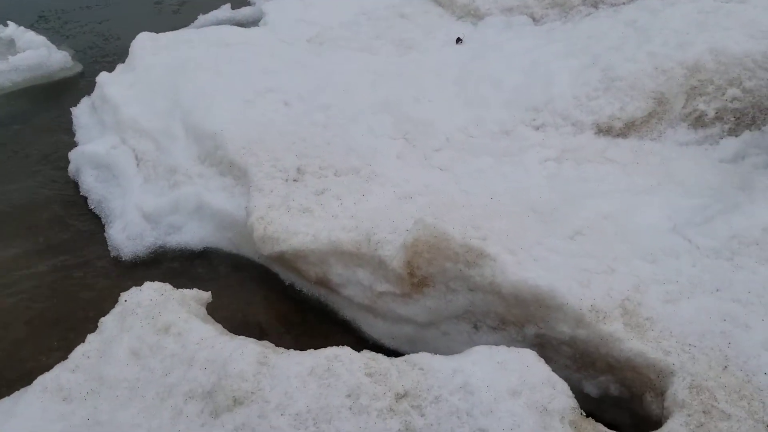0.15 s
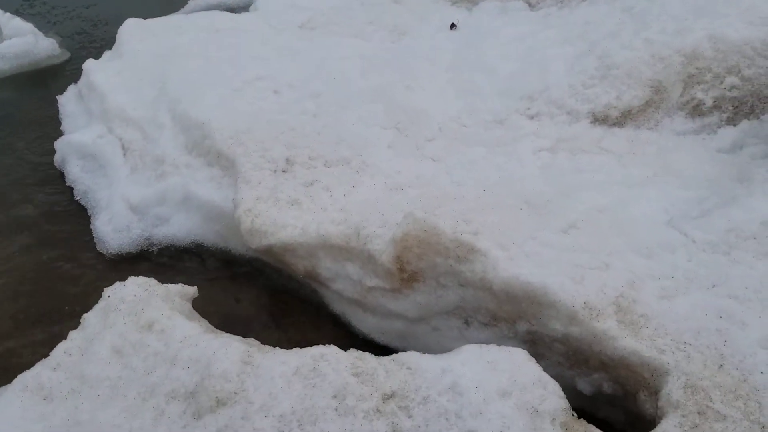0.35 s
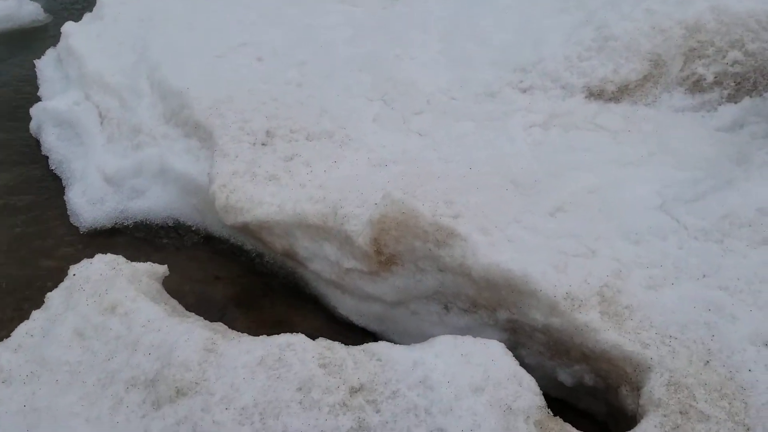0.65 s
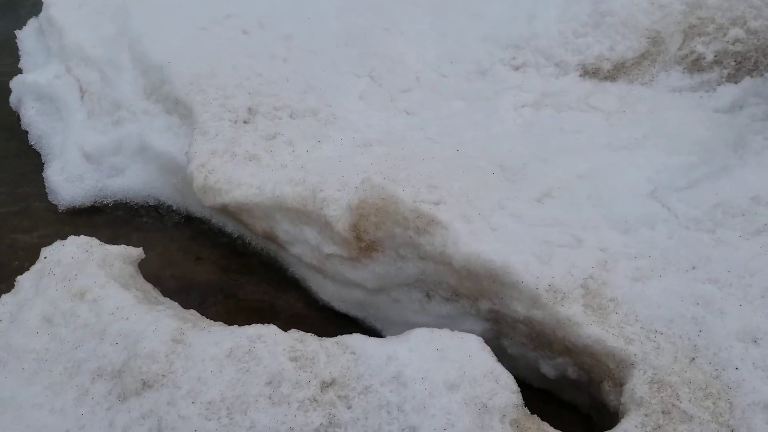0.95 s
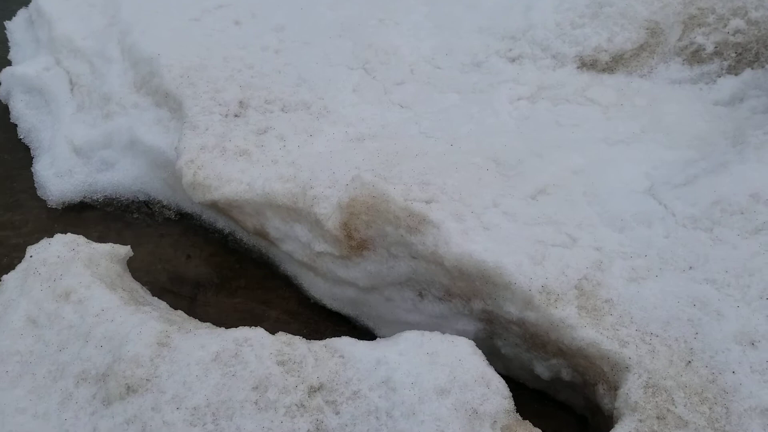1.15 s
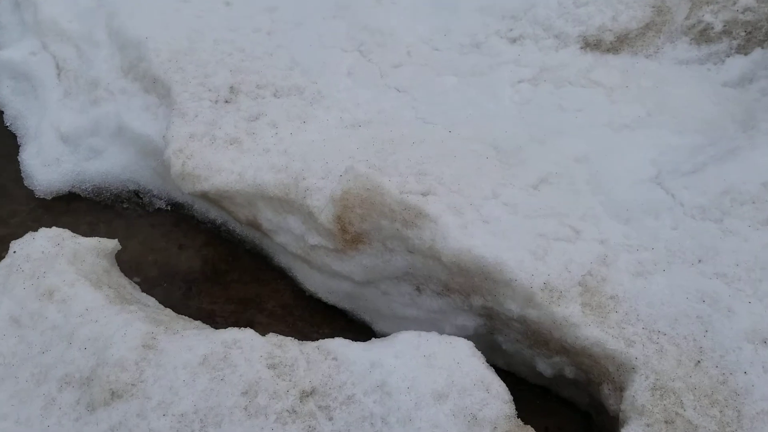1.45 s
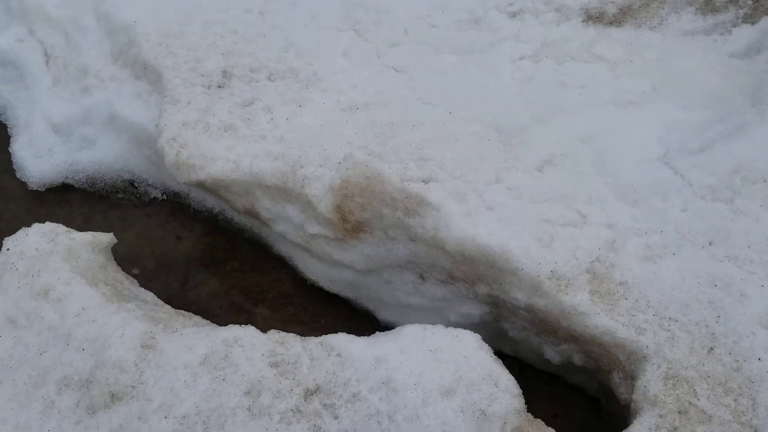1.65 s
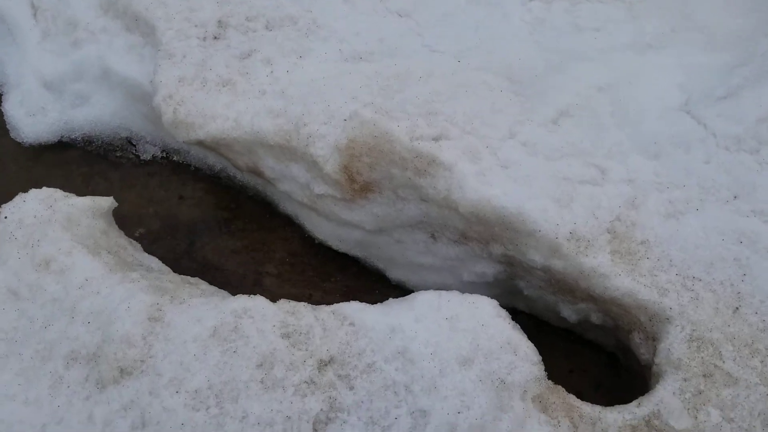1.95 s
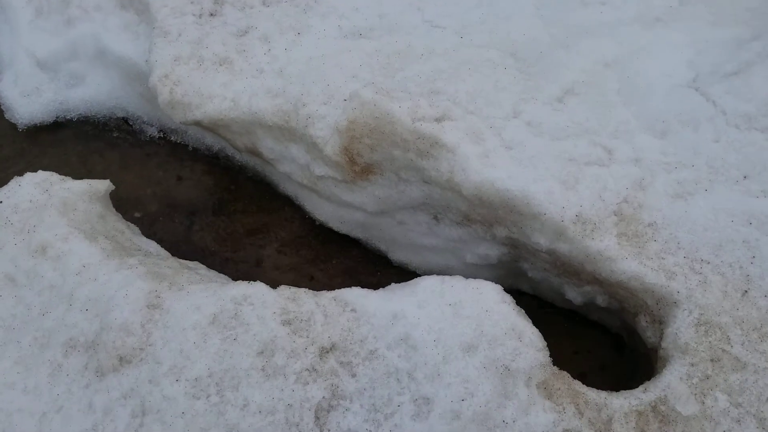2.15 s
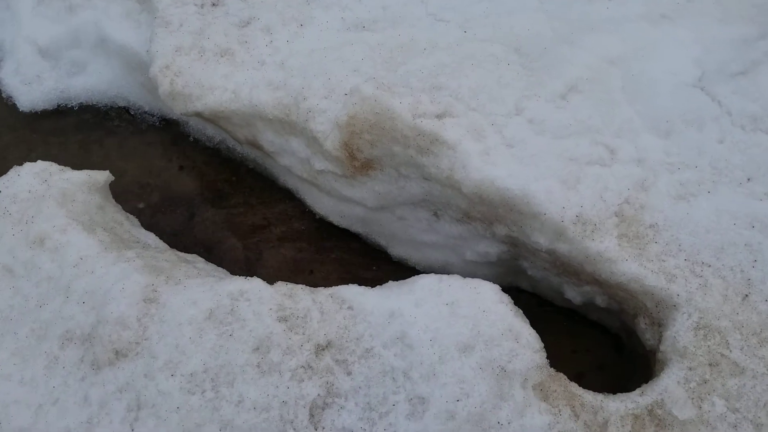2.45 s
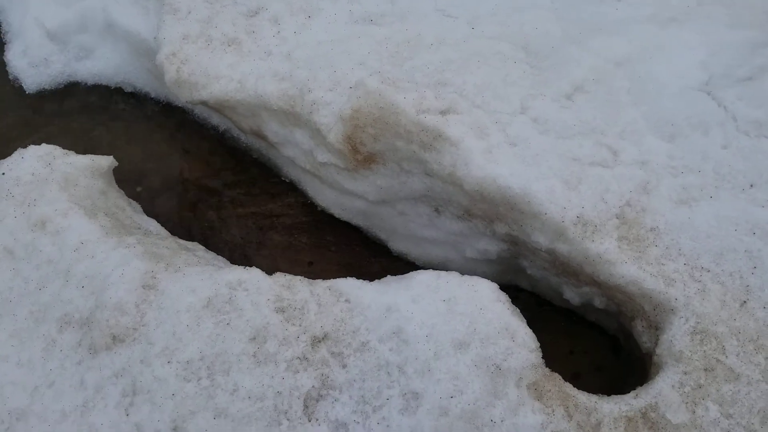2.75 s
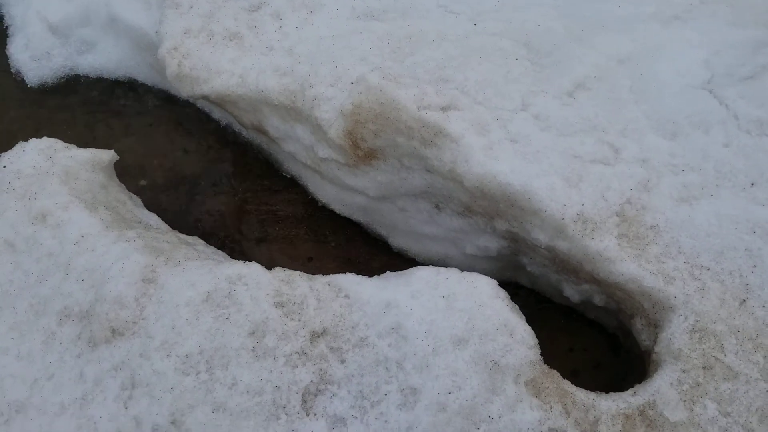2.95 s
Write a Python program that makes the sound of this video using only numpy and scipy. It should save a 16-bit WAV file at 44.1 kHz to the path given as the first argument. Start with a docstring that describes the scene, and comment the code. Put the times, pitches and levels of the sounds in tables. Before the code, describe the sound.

Icy crust cracks and crunches in dense short bursts over soft low wind.

```python
"""Cracking shore ice

Icy crust cracks and crunches in bursts on a frozen lake shore, close to a two-port microphone.
Each crack is a decaying hollow knock with a gated-noise snap; crushed grains are random clicks ringing
small pieces. Under them: gusty wind as shaped low noise, slab thuds as short sine bursts, and a faint
hiss of water and air as coloured noise."""
import sys
import numpy as np
from scipy import signal
from scipy.fft import rfft, irfft, next_fast_len
from scipy.io import wavfile
from scipy.ndimage import uniform_filter1d

SR = 44100
rng = np.random.default_rng(int(sys.argv[2]) if len(sys.argv) > 2 else 0)


def pcm_store(signal):
    """Save signal as 16-bit PCM."""
    levels = np.round(np.clip(np.atleast_2d(signal), -1, 1) * 32767)
    wavfile.write(sys.argv[1], SR, levels.astype(np.int16).T)


def volts_from_db(level):
    """Convert decibel levels to linear amplitude ratios."""
    exponent = np.asarray(level, float) / 20
    return 10 ** exponent


N = 136710  # samples

# Spectrum of the hiss. Each row: frequency in Hz, relative density in dB per Hz.
HISS_SPECTRUM = [(290, 12.5), (500, 10), (1160, -3.5), (1700, 4), (2590, -3.5), (5360, -12.5),
                 (12500, -16.5), (16200, -15)]
# Hiss level over time. Each row: time in seconds, level in dB.
HISS_LEVEL = [(0, -45), (1.3, -44), (3.1, -48.5)]
# Gusts on the microphone. Each row: time in seconds, buffeting level in dB before the port imbalance.
WIND_LEVEL = [(0, -52.5), (.3, -42), (.59, -37), (.64, -26), (.69, -48), (.87, -50), (.92, -37.5),
              (1.08, -44.5), (1.16, -36.5), (1.27, -40.5), (1.37, -34), (1.49, -36), (1.8, -37.5),
              (2.05, -47), (2.41, -37), (2.76, -43), (3.1, -45.5)]
# Spectrum of the wind noise. Each row: frequency in Hz, relative density in dB per Hz.
WIND_SPECTRUM = [(15, -45), (25, -9), (81, 1.5), (170, -9.5), (284, -16), (900, -37), (1170, -40)]
# Slabs settling into the water. Each row: centre in seconds, envelope peak in dB, frequency in Hz.
THUDS = [(.606, -25, 150), (1.342, -27, 273), (1.533, -21.5, 433), (1.886, -26.5, 237), (2.301, -21.5, 326),
         (2.404, -29, 83.4), (2.838, -28.5, 124)]
# Cracks. Each row: time in seconds, knock peak in dB before the body low-pass, knock frequency in Hz,
# snap level in dB before SNAP_GAIN_DB.
CRACKS = [(0.3314, -19.5, 1300, -26.5), (0.394, -18.5, 1290, -19.5), (0.4, -19.5, 740, -20.5),
          (0.4017, -20.5, 860, -49), (0.4062, -22, 1500, -40), (0.4118, -28, 1760, -43),
          (0.4182, -23, 1420, -42), (0.4228, -22, 1420, -48), (0.4284, -17, 1500, -41),
          (0.4374, -24, 1300, -34), (0.4454, -9.5, 1210, -21), (0.4921, -19.5, 1440, -34.5),
          (0.5476, -24, 1370, -30), (0.5627, -16.5, 1530, -23), (0.5654, -14, 900, -30),
          (0.5877, -14.5, 1330, -27), (0.607, -16.5, 760, -32), (0.6297, -16, 1450, -31.5),
          (0.7197, -18.5, 980, -33), (0.722, -29, 1500, -35), (0.8003, -14, 1270, -28),
          (0.8033, -15, 1500.0, -28), (0.8292, -12.5, 910, -26), (0.8762, -24.0, 1480, -56),
          (0.9571, -12, 890, -36), (1.01, -16.5, 1200, -33), (1.0134, -18, 1250, -29),
          (1.0448, -22.5, 1030, -56), (1.1042, -14, 1640, -27.5), (1.183, -25.5, 1650, -48),
          (1.4709, -13.5, 1290, -28), (1.4754, -21, 1370, -38), (1.4794, -19.5, 1870, -34),
          (1.5268, -21.5, 1800, -21.5), (1.5338, -13, 1710, -20), (1.5498, -28, 1900, -51),
          (1.559, -19, 780, -34), (1.5738, -11, 930, -24), (1.6101, -22.5, 1750, -27),
          (1.6452, -13, 1490, -22), (1.65, -20.5, 1320, -37), (1.6833, -10.5, 1500, -21),
          (1.6885, -21, 1830, -18), (1.7536, -14, 695, -20), (1.7797, -14.5, 950, -26.5),
          (1.8118, -11, 664, -22), (1.8215, -17, 1970, -37), (1.8275, -18, 1700, -30),
          (1.8387, -14.5, 1500.0, -28), (1.8441, -22, 1500, -36), (1.9065, -17, 2260, -19.5),
          (1.9422, -18.5, 1080, -29), (1.9552, -19, 1260, -33), (1.9814, -22.5, 633, -39),
          (1.991, -20, 1000, -29), (2.0432, -18, 1270, -28), (2.3036, -22, 1190, -24),
          (2.3075, -17, 694, -43), (2.3543, -21, 1080, -38), (2.4156, -16.5, 1030, -20.5),
          (2.4441, -23.5, 1030, -18.5), (2.469, -25.5, 1510, -31), (2.6078, -25, 1860, -39)]
# Splinters, bright ticks with little body. Each row: time in seconds, snap level in dB before SNAP_GAIN_DB.
SPLINTERS = [(0.228, -30), (0.7893, -33.5), (1.691, -25), (1.8997, -27), (2.0054, -27.5), (2.083, -34),
             (2.408, -25), (2.5355, -32.5), (2.605, -39), (2.6202, -27), (2.647, -36.5), (2.681, -36),
             (2.779, -25)]
# Crust being crushed. Each row: start in seconds, length in seconds, body level in dB before the body
# low-pass, treble level in dB.
CRUNCHES = [(0.23, 0.024, -41, -60), (0.399, 0.076, -37.5, -52.5), (0.558, 0.012, -31, -53),
            (0.714, 0.0091, -35.5, -43), (0.765, 0.032, -40, -50.5), (0.811, 0.033, -30.5, -45),
            (0.846, 0.028, -47.5, -57), (1.038, 0.079, -42, -63), (1.465, 0.012, -23.5, -35),
            (1.524, 0.049, -38, -46.5), (1.812, 0.051, -40.5, -53), (1.894, 0.018, -35, -49),
            (1.972, 0.041, -38, -55.5), (2.057, 0.023, -38.5, -57), (2.28, 0.051, -39.5, -43),
            (2.342, 0.028, -38.5, -47), (2.406, 0.012, -31, -49.5), (2.435, 0.023, -34, -47),
            (2.6, 0.031, -40.5, -53)]
# Spectrum of snaps and dust. Each row: frequency in Hz, relative density in dB per Hz.
SNAP_SPECTRUM = [(1760, -36), (3000, -7), (3840, -10), (6470, 1), (7780, -12), (12600, -2), (15500, -14),
                 (16200, -24)]

LUMP_DB, OWN_LUMP_DB = 4, 4  # rms level swing: shared, per port
WIND_SAME, WIND_IMBALANCE_DB = 0.035, 0.8  # imbalance: left up, right down
BUFFET_HZ, ROAR_DB = 158, -22.5
ROAR_FOLLOWS = 0.59  # exponent: above the buffeting the roar follows gusts only in part
THUD_CYCLES = 2.95

RISE_S, KNOCK_T60_S, BODY_TOP_HZ = 0.00025, 0.0068, 3000
RING_HZ, RING_DB = 1950, -4  # microphone port resonance: nominal frequency, level re the knock sine
SNAP_T60_S, SNAP_GAIN_DB, SNAP_SAME = 0.0072, 1.5, 0.054
SPLINTER_BODY_DB, SPLINTER_HZ = -19.5, 1500  # body peak re the snap
RATTLE_DB, RATTLE_T60_S = -19, 0.027  # chips rattle on after each crack, re the knock
GRAINS_PER_S, GRAIN_SPREAD_DB = 700, 4
DUST_PER_S, DUST_SPREAD_DB = 1500, 0.5
CRUNCH_EDGE_S, SETTLE_S, SETTLE_DB = 0.0017, 0.085, -9
STRAY_PER_S, STRAY_BODY_DB, STRAY_TREBLE_DB = 60, -58, -61  # lone crumbs ticking at any time
ECHO_S, ECHO_DB = (0.001, 0.0016), -23  # a near reflection reaches each port at its own time
LEFT_LAG_S = 0.00008


def evened(x):
    """Scales to rms 1."""
    return x / np.sqrt(np.mean(x ** 2) + 1e-20)


def add(mix, start_s, sound):
    """Adds a sound into the mix in place, cut at the end."""
    part = mix[..., round(start_s * SR):][..., :sound.shape[-1]]
    part += sound[..., :part.shape[-1]]


def colour(x, spectrum):
    """Filters by a (Hz, dB) table, keeping the power of white noise."""
    hz, db = np.transpose(spectrum)
    size = next_fast_len(N)
    bin_hz = np.fft.rfftfreq(size, 1 / SR) + 1  # +1 avoids log(0)
    gain = volts_from_db(np.interp(np.log(bin_hz), np.log(hz), db, left=-90, right=-90))
    return irfft(rfft(x, size) * evened(gain), size)[..., :N]


def curve(points):
    """Gain over time, linear in dB between (s, dB) points."""
    s, db = np.transpose(points)
    return volts_from_db(np.interp(np.arange(N) / SR, s, db))


def slow(width_s, count):
    """Noise smoothed by two moving averages, rms 1."""
    size = round(width_s * SR)
    noise = rng.standard_normal((count, N))
    return evened(uniform_filter1d(uniform_filter1d(noise, size), size))


def pair(same):
    """Two white noises whose correlation is same."""
    a, b = rng.standard_normal((2, N))
    return np.array([a, same * a + np.sqrt(1 - same ** 2) * b])


def delayed(x, delay_s):
    """Shifts later by whole samples, silence first."""
    return np.interp(np.arange(N) - round(delay_s * SR), np.arange(N), x, left=0)


def hiss():
    """Faint wide hiss of distant water and air: nearly independent coloured noises, slightly uneven."""
    flutter = volts_from_db(0.37 * slow(0.0033, count=1))
    return curve(HISS_LEVEL) * flutter * colour(pair(0.0071), HISS_SPECTRUM)


def wind():
    """Low turbulence, unlike at the two ports: lumpy buffeting under a steadier roar."""
    lumps = volts_from_db(LUMP_DB * slow(0.012, count=1) + OWN_LUMP_DB * slow(0.0038, count=2))
    air = colour(pair(WIND_SAME), WIND_SPECTRUM)
    low_pass = signal.butter(2, BUFFET_HZ, fs=SR, output="sos")
    buffet = signal.sosfiltfilt(low_pass, air)
    gusts = curve(WIND_LEVEL)
    roar = volts_from_db(ROAR_DB) * (gusts * lumps) ** ROAR_FOLLOWS * evened(air - buffet)
    balance = volts_from_db([[WIND_IMBALANCE_DB], [-WIND_IMBALANCE_DB]])
    return (gusts * evened(lumps * buffet) + roar) * balance


def thuds():
    """Slabs settling into the water: soft low sine bursts of about three cycles under a Hann envelope."""
    out = np.zeros(N)
    for centre_s, db, hz in THUDS:
        t = np.arange(0, THUD_CYCLES / hz, 1 / SR)
        burst = np.hanning(len(t)) * np.sin(2 * np.pi * hz * t)
        add(out, centre_s - t[-1] / 2, volts_from_db(db) * burst)
    return out


def knock(hz, chance):
    """Crust knock: a fast-decaying sine plus the microphone port's ring, its pitch and phase varied; peak 1."""
    t = np.arange(0, 0.015, 1 / SR)
    ring_hz = RING_HZ * (0.78 + 0.54 * chance[0])
    ring = volts_from_db(RING_DB) * np.sin(2 * np.pi * (ring_hz * t + chance[1]))
    envelope = (1 - np.exp(-(t / RISE_S) ** 2)) * volts_from_db(-60 * t / KNOCK_T60_S)
    wave = envelope * (np.sin(2 * np.pi * hz * t) + ring)
    return wave / abs(wave).max()


def scatter(per_s, spread_db):
    """Random clicks of uneven size, mean power 1."""
    size = volts_from_db(spread_db * np.minimum(rng.exponential(1, N), 4))
    return evened(size * (rng.random(N) < per_s / SR))


def grains(clicks, count=12):
    """Each click rings one of a set of small crust pieces, picked at random."""
    piece = rng.integers(0, count, N)
    chances = rng.random((count, 2))
    out = np.zeros(N)
    for k, hz in enumerate(np.geomspace(550, 2000, count)):
        tap = knock(hz, chances[k])
        out += signal.oaconvolve(clicks * (piece == k), tap / np.linalg.norm(tap))[:N]
    return out


def snap_envelope():
    """Brittle snap: fast rise, exponential decay."""
    t = np.arange(0, 0.012, 1 / SR)
    return (1 - np.exp(-t / RISE_S)) * volts_from_db(SNAP_GAIN_DB - 60 * t / SNAP_T60_S)


def cracks(puff):
    """Cracks and splinters: returns knocks, decaying chip-rattle levels and snap gate."""
    knocks, chips, snaps = np.zeros((3, N))
    rattle = volts_from_db(RATTLE_DB - 60 * np.arange(0, RATTLE_T60_S, 1 / SR) / RATTLE_T60_S)
    rows = list(CRACKS) + [(s, db + SPLINTER_BODY_DB, SPLINTER_HZ, db) for s, db in SPLINTERS]
    chances = rng.random((len(rows), 2))
    for (s, db, hz, snap_db), chance in zip(rows, chances):
        add(knocks, s - 2 * RISE_S, volts_from_db(db) * knock(hz, chance))
        add(chips, s + 4 * RISE_S, volts_from_db(db) * rattle)
        add(snaps, s - 2 * RISE_S, volts_from_db(snap_db) * puff)
    return knocks, chips, snaps


def crunches():
    """Crushing levels, body and treble; crumbs keep trickling after each crunch."""
    levels = np.zeros((2, N))
    for start_s, length_s, *db in CRUNCHES:
        add(levels, start_s, volts_from_db(db)[:, None] * np.ones(round(length_s * SR)))
    levels = uniform_filter1d(levels, round(CRUNCH_EDGE_S * SR))
    fade = np.exp(-1 / (SETTLE_S * SR))
    trickle = signal.lfilter([1 - fade], [1, -fade], levels)
    return np.maximum(levels, volts_from_db(SETTLE_DB) * trickle)


def ice():
    """Knocks and rattling grains form the body; snaps and dust gate a bright noise."""
    puff = snap_envelope()
    knocks, chips, snaps = cracks(puff)
    crush_body, crush_treble = crunches()
    stray = scatter(STRAY_PER_S, GRAIN_SPREAD_DB)
    clicks = (crush_body + chips) * scatter(GRAINS_PER_S, GRAIN_SPREAD_DB)
    body = knocks + grains(clicks + volts_from_db(STRAY_BODY_DB) * stray)
    body = signal.sosfilt(signal.butter(4, BODY_TOP_HZ, fs=SR, output="sos"), body)
    dust = crush_treble * scatter(DUST_PER_S, DUST_SPREAD_DB) + volts_from_db(STRAY_TREBLE_DB) * stray
    gate = snaps + signal.oaconvolve(dust, puff / np.linalg.norm(puff))[:N]
    return body + colour(gate * pair(SNAP_SAME), SNAP_SPECTRUM)


def scene():
    """Ice and thuds with a near reflection, left port lagging, over wind and hiss."""
    crust = ice() + thuds()
    left, right = [x + volts_from_db(ECHO_DB) * delayed(x, s) for x, s in zip(crust, ECHO_S)]
    return np.array([delayed(left, LEFT_LAG_S), right]) + wind() + hiss()


def top_cut(x):
    """Nothing passes above the cut-off."""
    return signal.sosfilt(signal.butter(12, 16990, fs=SR, output="sos"), x)


def record(dry):
    """Returns the finished mix as stored."""
    return top_cut(dry)


dry = scene()
out = record(dry)
pcm_store(out)
```